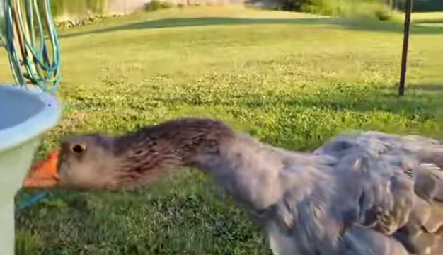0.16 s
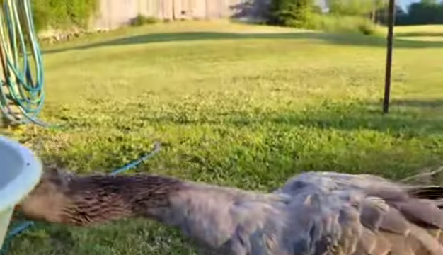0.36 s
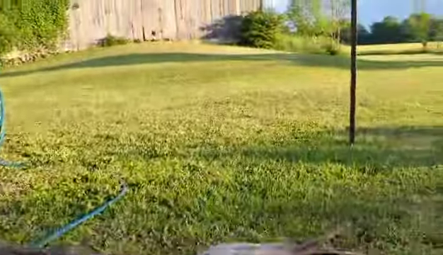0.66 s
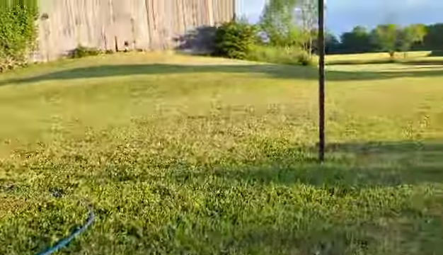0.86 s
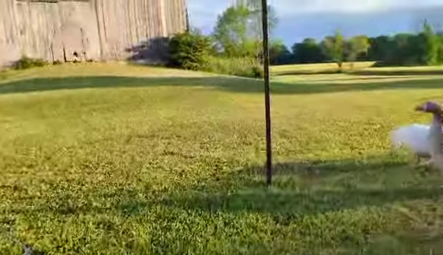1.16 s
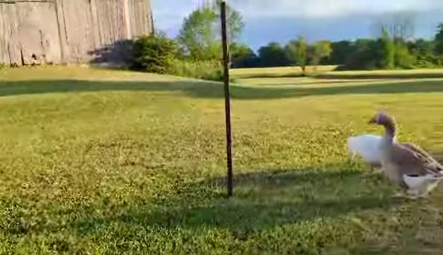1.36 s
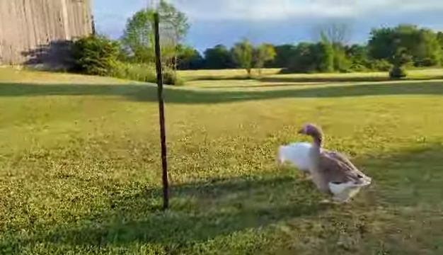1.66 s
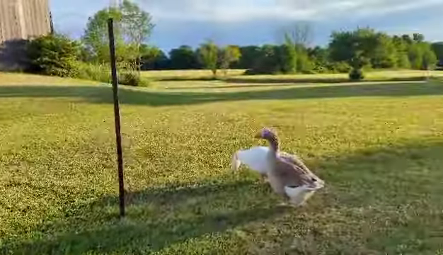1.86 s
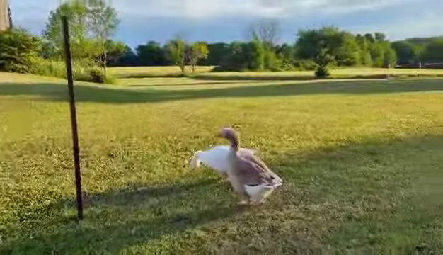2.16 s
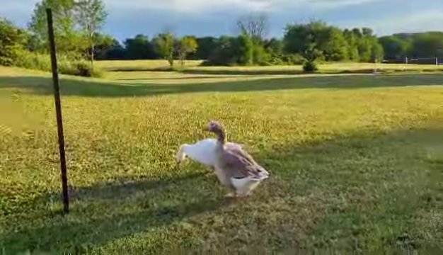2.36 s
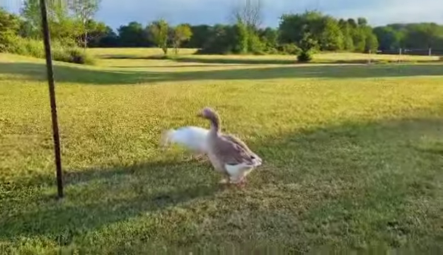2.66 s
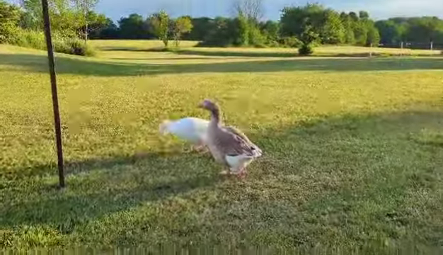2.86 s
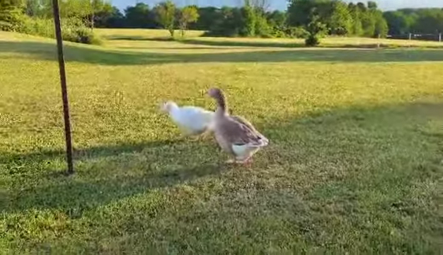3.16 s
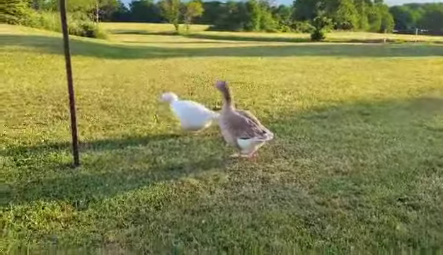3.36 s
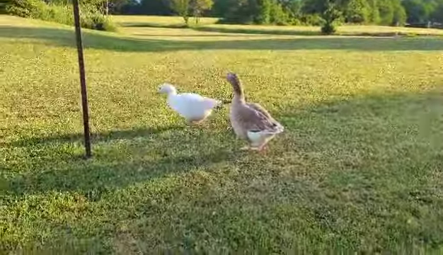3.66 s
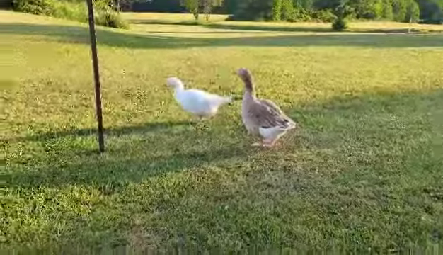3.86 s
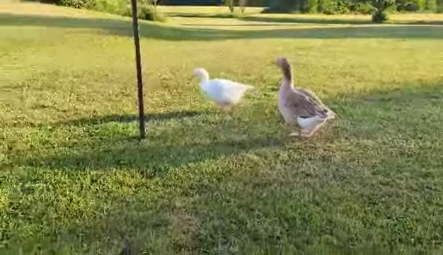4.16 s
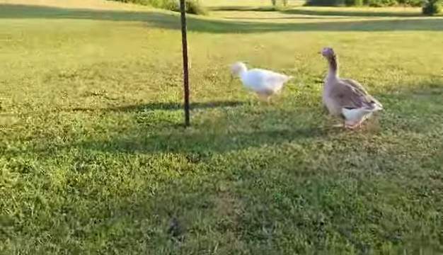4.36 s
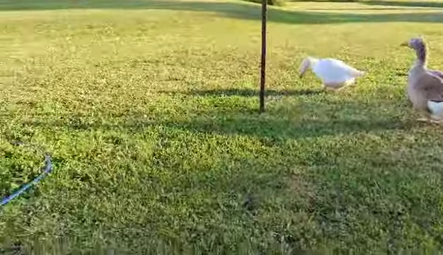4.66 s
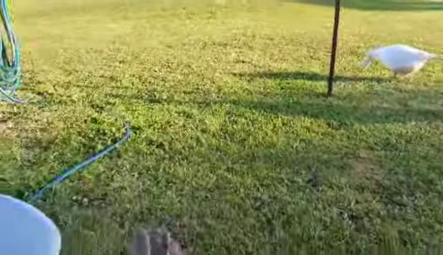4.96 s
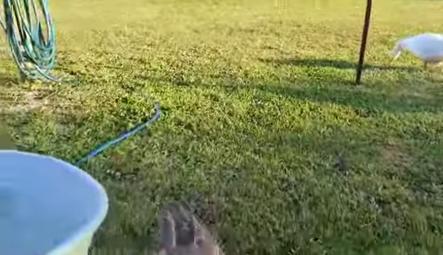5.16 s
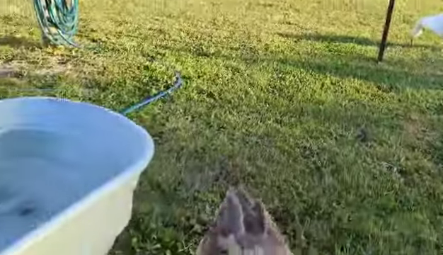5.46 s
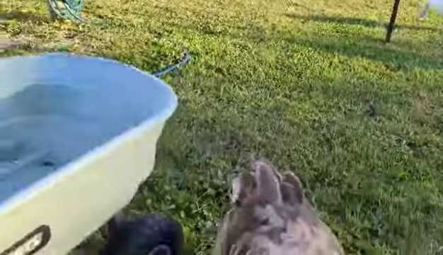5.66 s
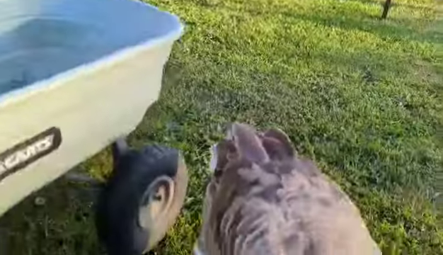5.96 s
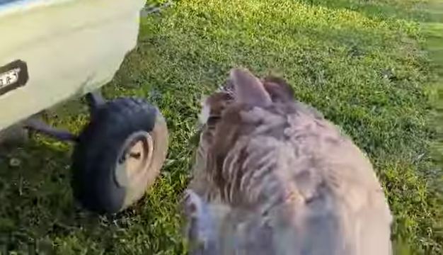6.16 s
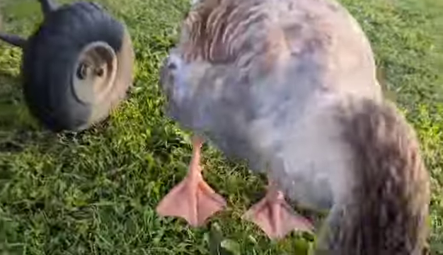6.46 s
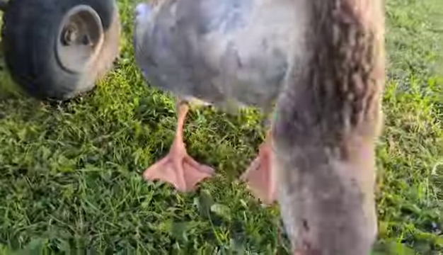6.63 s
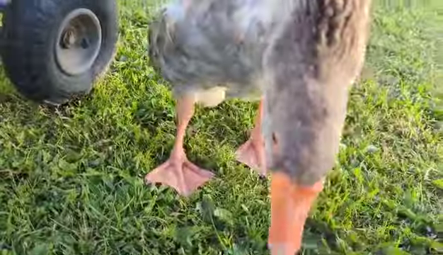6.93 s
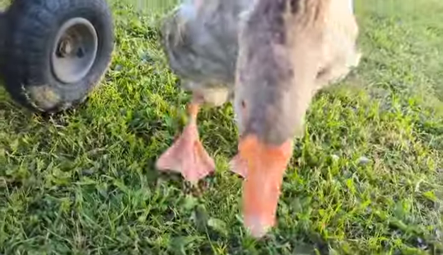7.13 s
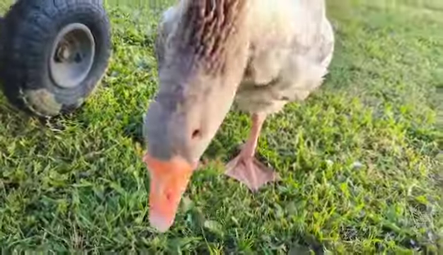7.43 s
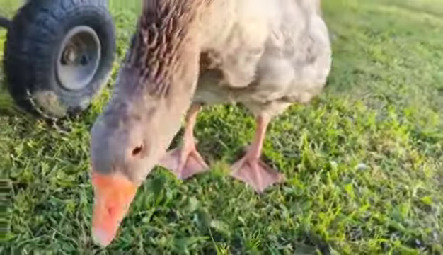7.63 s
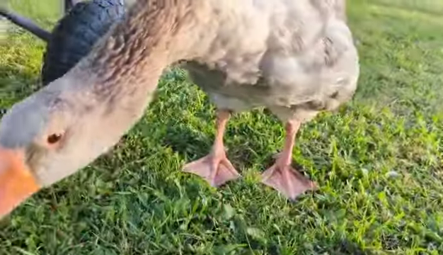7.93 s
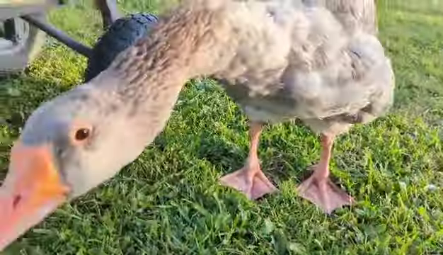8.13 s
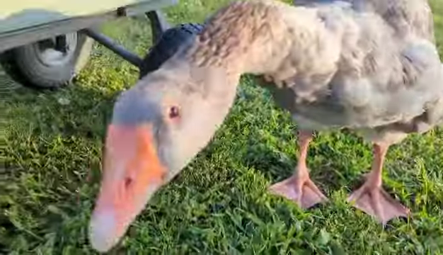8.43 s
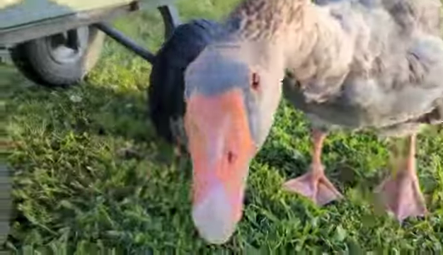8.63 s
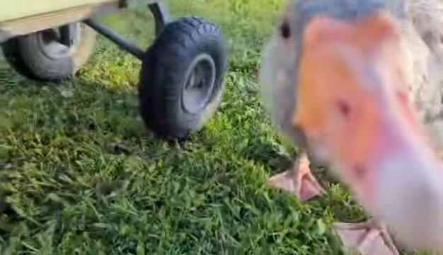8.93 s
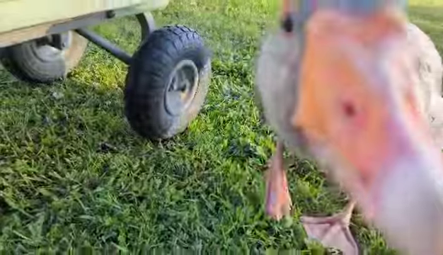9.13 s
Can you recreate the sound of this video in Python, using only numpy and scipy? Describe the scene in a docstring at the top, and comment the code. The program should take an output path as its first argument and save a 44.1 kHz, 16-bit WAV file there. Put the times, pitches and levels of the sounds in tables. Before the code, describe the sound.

From 0 to 0.8 s a goose very close gabbles fast and loud, sliding cries around 600 to 850 Hz alternating with lower, rasping honks near 570 Hz. It stops; a thin distant bird whistles at about 1 s, and hollow dull thuds knock at 1, 1.3, 1.6 and 2.4 s. A shorter, softer gabble at 2.1 to 2.6 s runs into six short, even honks from farther off until 3.7 s, growing louder. From 4.3 to 6.1 s come dry bill snaps, the sharpest at 5.7, breathy hisses and faint whimpers, with light rustling and slight wind puffs. Small falling whimpers at 6.3 to 6.7 s precede five nasal, swelling honks slightly right, 6.8 to 7.6 s. A hard rasping squawk bursts out at 7.7, then a pulsing, fluttering cackle with cries until 8.4 s. Only soft brushing and still open air remain, almost without echo.

```python
"""Geese on an open lawn

One goose gabbles close by with both sides of its syrinx: a sliding cry breaks into a lower honk, torn by
a fluttering rasp. In between it whimpers and hisses; at the end it squawks and cackles. Its voices are
harmonics through throat filters, its rasps slaps and puffs of noise. Two runs of short honks come from
farther off. Hollow thuds and rustles are shaped noise, a distant bird whistles in sines, a breeze buffets."""
import sys
import numpy as np
from scipy import signal
from scipy.fft import rfft, irfft, next_fast_len
from scipy.io import wavfile
from scipy.ndimage import map_coordinates

SR = 44100
rng = np.random.default_rng(int(sys.argv[2]) if len(sys.argv) > 2 else 0)


def master_out(mix):
    """Clip the mix to full scale and print it as 16-bit PCM to the path in sys.argv[1]."""
    frames = np.transpose(np.atleast_2d(mix))
    ceiling = np.clip(frames, -1, 1)
    pcm = np.round(ceiling * 32767).astype(np.int16)
    wavfile.write(sys.argv[1], SR, pcm)


N = 409679  # length [samples]

# where the near goose stands: (time [s], lead of the left microphone [ms], left over right [dB])
PLACE = [(.1, 0.24, 0), (.7, 0.329, 1.5), (2.1, 0.36, 2.5), (2.55, 0.34, -1), (4.35, -.08, -5),
         (4.9, .16, -8.5), (5.7, -.06, -5.5), (6.35, 0.2, 1), (6.7, 0.092, -0.5), (7.75, 0.19, 0.5),
         (8, 0.29, 2)]
# strain in its voice: (time [s], flutter rate [Hz], roughness [0-1])
STRAIN = [(.1, 185.9, 0.12), (.45, 189, 0.19), (.78, 178.7, 0.34), (2.2, 174.6, 0.25), (2.45, 169.5, 0.4),
          (7.92, 172.7, 0.07)]
# cries in its high voice: (start [s], length [s], start pitch [Hz], middle pitch [Hz], end pitch [Hz],
# level [dB], overtone tilt at the top pitch [dB per octave], roughness [0-1])
CRIES = [(0, 0.12, 616, 516.6, 495, -44, -5, 0.3), (0.081, 0.11, 610.6, 771, 635, -33.5, -22, 0.29),
         (0.22, 0.054, 658.5, 732, 745, -33.5, -7, 0.27), (0.286, 0.056, 694, 795, 843, -30, -5, 0.1),
         (0.385, 0.069, 728, 827, 787, -29.5, -6, 0.04), (0.492, 0.069, 787, 812, 840, -26.5, -4, 0.19),
         (0.591, 0.052, 766, 806, 863, -28, -2.5, 0.17), (0.698, 0.053, 787, 810, 851, -32, -0.5, 0.12),
         (.764, 0.06, 833, 775, 710, -39.5, -1.5, 0.4), (2.09, 0.054, 722, 761, 670, -34.5, -9.5, 0.16),
         (2.218, .074, 611, 677, 630, -40.5, -9.5, 0.2), (2.292, 0.099, 648, 763, 697, -39, -9.5, 0.24),
         (7.817, 0.045, 725, 683, 630, -39.5, -22, 0.5), (7.903, 0.026, 780, 822, 860, -22.5, -9, 0.28),
         (8.208, 0.056, 698, 744, 762, -29, -7.5, 0.23), (8.273, 0.046, 809, 734.5, 625, -30, -19.5, 0.39)]
# honks in its low voice: (start [s], length [s], top pitch [Hz], tone level [dB], rasp level [dB])
HONKS = [(0.115, 0.045, 553.5, -28.5, -34), (0.262, 0.048, 529.5, -38, -42),
         (0.329, 0.069, 571, -28.5, -39.5), (0.416, 0.073, 597.3, -28.5, -35),
         (0.566, 0.02, 591, -27.5, -34.5), (0.65, .042, 569.4, -28, -35.5), (.758, 0.047, 576, -27.5, -32),
         (2.1, 0.048, 539.5, -44, -48), (2.3, 0.078, 563, -39, -51.5), (2.405, 0.096, 574, -30, -40.5),
         (2.511, 0.071, 560.4, -30, -36.5), (6.623, .034, 483, -50.5, -67), (7.814, 0.033, 533, -34, -48.5),
         (7.931, 0.023, 556, -27.5, -35.5), (8.338, 0.12, 529.5, -55.5, -50)]
# throat colour of the cries' overtones: (frequency [Hz], gain [dB])
CRY_THROAT = [(1600, -8), (2450, -10.5), (3300, -3), (4100, -13), (4900, -9), (6600, -11), (12500, -43)]
# throat colour of the honks' tone: (frequency [Hz], gain [dB])
HONK_THROAT = [(550, -8), (1150, 6), (1600, -24.5), (2250, -8.5), (2800, -26.5), (3400, -21.5), (4100, -32),
               (6600, -33), (12000, -56)]
# throat colour of the noisy rasp: (frequency [Hz], gain [dB])
RASP_THROAT = [(50, -30), (170, 2), (360, -15.5), (560, 11.5), (1150, 11), (1520, -4.5), (2050, 14),
               (2750, -6.5), (3500, 1.5), (4400, -19), (6500, -16), (13000, -50)]
# throat colour of the flutter's even multiples in a honk: (frequency [Hz], gain [dB])
SUBTONE_THROAT = [(750, -1), (1100, -10), (1470, -14), (1850, 1), (2250, -4), (2600, -11), (2950, -7),
                  (3650, -7), (4400, -22), (7000, -27)]

# level of the wind's buffeting before gusts: (time [s], level [dB])
BREEZE = [(3.6, -68.5), (3.9, -90), (6.8, -80), (7.9, -75), (8.6, -83)]
# puffs of wind on the microphones: (time [s], left level [dB], right level [dB])
PUFFS = [(3.057, -56, -43), (3.24, -54.5, -45.5), (4.864, -53, -88), (5.269, -62.5, -80), (5.748, -59, -69)]
# colour of the buffeting: (frequency [Hz], gain [dB])
BUFFET = [(20, -31.5), (40, -8), (70, 5.5), (120, -3), (220, -15), (1500, -73.5)]
# steady rustling: (time [s], level [dB])
RUSTLE = [(.9, -62.5), (1.1, -76.5), (3.4, -87.5), (4.9, -57), (7, -64.5), (9.2, -62.5)]
# brief swishes close by: (time [s], level [dB])
SWISHES = [(.878, -64.5), (2.049, -61), (3.82, -59.5), (4.002, -55.5), (4.301, -55), (6.504, -55.5),
           (6.75, -48.5), (7.232, -48), (8.679, -59.5), (9.151, -55.5)]
# colour of rustles and swishes: (frequency [Hz], gain [dB])
FEATHERS = [(300, -15.5), (1300, -7.5), (5000, -0.5), (12500, 0.5)]
# colour of the still air: (frequency [Hz], gain [dB])
AIR = [(59, -22.5), (100, -2.5), (266, -7.5), (1250, 0.5), (2120, -1), (2820, -2.5), (13000, -15)]
# decay of the yard's reverberation: (frequency [Hz], t60 [s])
YARD_T60 = [(200, 0.34), (1000, 0.15), (3000, 0.38), (10000, 0.05)]

# a distant bird's whistles: (start [s], length [s], start pitch [Hz], end pitch [Hz], peak level [dB])
WHISTLES = [(0.953, 0.38, 3570, 3420, -67.5), (1.519, 0.086, 3100, 3080, -70.5)]
# hollow thuds: (time [s], level [dB], t60 [s])
THUDS = [(0.963, -47, 0.16), (1.318, -52.5, 0.1), (1.565, -37, 0.18), (2.362, -35.5, 0.47)]
# colour of the hollow body: (frequency [Hz], gain [dB])
THUD_BODY = [(90, -21.5), (230, 2), (480, -6.5), (700, -9.5), (2500, -35), (6000, -46.5)]

# short honks from farther off: (start [s], length [s], pitch [Hz], fall [share of the pitch], level [dB],
# roughness [0-1], left over right [dB], overtone tilt [dB per octave])
ANSWERS = [(2.617, 0.086, 508.3, 0.013, -35, 0.3, -2, -1.5), (2.827, .11, 507, 0, -40, 0.29, -1, -4),
           (3.039, .11, 507, .01, -35, 0.4, -1, -1.5), (3.222, .12, 512.5, .04, -28, 0.24, -0.5, 0),
           (3.4, .12, 501.5, .01, -28.5, 0.06, -3.5, 0), (3.573, 0.11, 498.7, 0.016, -28, 0.06, -3.5, 0.5),
           (6.805, 0.11, 524, 0.033, -39.5, .3, -2.5, -4), (7.016, .11, 543.7, 0.056, -35.5, .4, -2, -0.5),
           (7.19, 0.12, 534, 0.075, -30, 0.16, -3.5, 0.5), (7.365, .11, 523.7, 0.056, -28, 0.06, -2, 1),
           (7.544, 0.085, 507, 0.055, -29.5, .12, -1.5, 2)]
# course of a short honk: (time [share of its length], pitch [ratio], tone level [dB], rasp level [dB])
COURSE = [(0, .96, -48, -28), (.08, .96, -29, -18.5), (.12, .97, -11.5, -5.5), (.27, .995, -3, -8.5),
          (.45, 1.003, 2, -41.5), (.65, 1, -2.5, -35), (.82, .98, -4, -26), (1, .88, -24, -27)]
# throat colour of the first run: (frequency [Hz], gain [dB])
FIRST_THROAT = [(500, -8.5), (1000, 2), (1500, -21), (2500, -29.5), (3020, -13.5), (3550, -42.5),
                (4100, -30.5), (4600, -36), (5700, -57.5), (6700, -38.5), (8200, -38.5), (12500, -51.5)]
# throat colour of the second run: (frequency [Hz], gain [dB])
SECOND_THROAT = [(500, -1.5), (1050, 0), (1600, -5.5), (2100, -17), (2600, -11.5), (3100, -15.5),
                 (3700, -30.5), (4400, -28), (5800, -41), (12500, -44)]
# colour of the opening rasp: (frequency [Hz], gain [dB])
ANSWER_RASP = [(120, -11.5), (350, -15), (520, -7), (760, 14), (1080, -11), (1400, -12.5), (3100, -10.5),
               (3800, -31.5), (13000, -42)]
# colour of the grit at half the pitch: (frequency [Hz], gain [dB])
ANSWER_GRIT = [(300, -17.5), (750, 5), (1400, -2.5), (2000, -14), (3200, -5.5), (3900, -32.5),
               (6800, -19.5), (13000, -43.5)]
# colour of the second bird's bright catch: (frequency [Hz], gain [dB])
CATCH = [(300, -5), (800, -3.5), (1700, -2.5), (3000, -3.5), (4400, -9.5), (5500, -30), (12000, -33)]

# the near goose's hisses: (start [s], length [s], attack [s], throat level [dB], sizzle level [dB])
HISSES = [(4.355, 0.049, .06, -45, -49), (4.787, 0.5, .1, -57, -52), (5.655, 0.14, 0.011, -44, -46.5),
          (5.863, 0.07, .04, -62, -58.5)]
# throat part of a hiss: (frequency [Hz], gain [dB])
HISS_THROAT = [(450, -21), (950, -5.5), (1300, 8), (2300, -5), (6000, -44)]
# sizzling part of a hiss: (frequency [Hz], gain [dB])
HISS_SIZZLE = [(1000, -23), (2800, -0.5), (6000, 0.5), (13000, -16.5)]
# snaps of the bill around the hisses: (time [s], level [dB])
SNAPS = [(4.287, -37), (4.432, -35), (4.853, -43), (5.253, -40), (5.298, -45), (5.657, -21)]
# colour of the bill's snap: (frequency [Hz], gain [dB])
BILL = [(150, -31), (600, -13.5), (1200, 12.5), (2200, -5), (3200, -18.5), (12000, -22.5)]
# whimpers through the nearly shut bill: (start [s], length [s], start pitch [Hz], middle pitch [Hz],
# end pitch [Hz], level [dB], overtone over fundamental [dB])
WHIMPERS = [(4.734, 0.095, 796, 682, 577, -55.5, 0), (5.132, 0.095, 725, 705, 655, -60, -16),
            (5.966, 0.086, 812, 840, 780, -65.5, -11.5), (6.066, 0.017, 795, 774, 740, -56, -6),
            (6.333, 0.039, 902, 932, 900, -52.5, -3.5), (6.375, 0.05, 794, 808, 697, -48.5, -12),
            (6.652, 0.035, 890, 870, 837, -47.5, -11), (6.696, 0.044, 790, 742, 690, -42.5, -11.5)]
# throat colour of the squawk: (frequency [Hz], gain [dB])
SQUAWK_THROAT = [(80, -37), (190, 1), (370, -23), (570, -7.5), (1150, 3), (1700, -14.5), (2300, -4),
                 (3000, -16.5), (3900, -12.5), (4500, -26), (6800, -32.5), (13000, -52.5)]
# the closing cackle, one unbroken flutter: (time [s], flutter rate [Hz], level [dB])
CACKLE = [(7.895, 171, -46), (7.91, 176.9, -31), (7.957, 172, -34), (7.995, 174.1, -28.5),
          (8.03, 186.5, -25), (8.064, 169.9, -32), (8.099, 162.5, -33), (8.13, 172.1, -30.5),
          (8.17, 187.2, -23.5), (8.211, 169.5, -35.5), (8.235, 174, -33), (8.273, 190.8, -23),
          (8.309, 168.5, -31.5), (8.33, 148.5, -44.5)]
# cackle throat with the bill shut: (frequency [Hz], gain [dB])
SHUT_THROAT = [(160, 3), (330, -24), (520, -9.5), (1000, -9), (1400, -22), (2000, -13), (2900, -25),
               (3800, -21), (4800, -39), (7500, -42)]
# cackle throat with the bill open: (frequency [Hz], gain [dB])
OPEN_THROAT = [(178, -12), (350, -33.5), (550, -4), (750, -4.5), (1450, -10), (2100, 0.5), (2900, -20.5),
               (3700, -12.5), (4600, -32), (7500, -39)]

# attack and release are the times to rise and to fall by 20 dB; swell is the middle over the ends
CRY_ATTACK_S, CRY_RELEASE_S, CRY_SWELL_DB = .012, 0.0046, 2
CRY_BRIGHTENING = 34  # change of tilt per octave of pitch [dB per octave]
CRY_RASP_DB = 2  # rasp under a cry at full roughness
CRY_WARBLE, CRY_JITTER = 1.1, .008  # flutter in the phase [radians]; random share of the pitch
HONK_ATTACK_S, HONK_RELEASE_S, HONK_SWELL_DB = .007, 0.011, 3.5
HONK_ARCH, HONK_SAG = .05, .02  # shares of the pitch: ends below the middle; fall from start to end
FULL_HONK_DB, HONK_DULLING = -27, 1  # below this level overtones fade: dB per octave, for each dB
HONK_RASP_DB, SUBTONE_DB = -2.5, -1  # noisy part and flutter multiples of a honk's rasp
RASP_SWELL_DB = 3.5  # a honk's rasp swells this much more than its tone
FLUTTER_JITTER, RASP_AIR = .3, .9  # timing scatter at full roughness [radians]; air over slaps
DRIFT_DB = 3.3  # each overtone's own swelling and fading
GUST_DB, PUFF_RISE_S, PUFF_FALL_S = 4, 0.023, 0.076
RUSTLE_GRAIN_DB, RUSTLE_CHANGE_DB = 2.8, 2.5  # random level changes, about 60 and 14 times a second
SWISH_RISE_S, SWISH_FALL_S = .04, 0.019
AIR_DB, YARD_DB = -69, -18  # still air; the yard's answer below the voices
WHISTLE_FADE_S = 0.028
SECOND_BIRD_FROM_S = 5
SECOND_SOFT_START_DB, SECOND_SWELL_SHARE = 9, 0.27  # it swells more slowly, over this share of a honk
CATCH_DB, CATCH_T60_S = -15, 0.082
GRIT_DB, ANSWER_WANDER = -0.5, .008  # grit at full roughness; random share of the pitch
HISS_RELEASE_S, HISS_SWELL_DB = 0.058, 2.5
HISS_SAG_DB = 4  # the throat's loss as the air runs out
WHIMPER_FADE_S, WHIMPER_HAZE = 0.011, 0.51  # 20 dB fade; unsteadiness of phase [radians] and level
SQUAWK_S, SQUAWK_LENGTH_S, SQUAWK_HZ, SQUAWK_DB = 7.671, 0.058, 190, -20.5  # Hz: mean flutter rate
SQUAWK_SAG = .14  # share of its rate that the squawk's flutter loses
SQUAWK_JITTER, SQUAWK_AIR = .15, .3  # timing scatter [radians]; air over slaps
SHUT_HZ, OPEN_HZ = 165.9, 180  # flutter rates at which the bill is shut and wide open
CACKLE_JITTER, CACKLE_RASP_DB = .06, -6  # with the bill wide open: timing scatter [radians]; rasp
ODD_DB = -7  # odd flutter multiples with the bill wide open
MOUTH_SHUT_HZ, MOUTH_OPEN_HZ, MOUTH_WIDTH_HZ, MOUTH_DB = 700, 1080, 140, 14  # moving resonance
TOP_HZ = 13150  # band limit


def amp(db):
    """Decibels to gain."""
    return 10 ** (np.asarray(db) / 20)


def unit(x):
    """Scaled to rms 1."""
    return x / np.sqrt(np.mean(x ** 2) + 1e-20)


def along(points, hz):
    """(Hz, value) points read on a log axis."""
    f, v = np.transpose(points)
    return np.interp(np.log(hz + 1), np.log(f + 1), v)


def read(rows, t):
    """Each column after the first, at the times t."""
    s, *cols = np.transpose(rows)
    return [np.interp(t, s, c) for c in cols]


def span(start, end, fade=0.0063):
    """Sample indices, times and a soft-edged gate for one sound."""
    i = np.arange(max(0, int((start - fade) * SR)), min(N, int((end + fade) * SR)))
    t = i / SR
    edge = np.minimum(t - start + fade, end + fade - t) / fade
    return i, t, np.sin(np.pi / 2 * np.clip(edge, 0, 1)) ** 2


def syllable(s, length, attack_s, release_s, swell_db):
    """Sample indices, progress 0-1 and level in dB of one utterance: attack, rounded hold, release."""
    first = max(0, int((s - 3 * attack_s) * SR))
    last = min(N, int((s + length + 3 * release_s) * SR))
    i = np.arange(first, last)
    t = i / SR - s
    u = np.clip(t / length, 0, 1)
    edges = np.maximum(-t / attack_s, 0) + np.maximum((t - length) / release_s, 0)
    return i, u, -20 * edges - swell_db * (2 * u - 1) ** 2


def swell(s, rise_s, fall_s):
    """A smooth rise to the time s and a fall after it."""
    t = np.arange(N) / SR - s
    return np.exp(-np.minimum((t / np.where(t < 0, rise_s, fall_s)) ** 2, 20))


def wobble(n, rate):
    """A smooth random curve with rate knots a second."""
    return map_coordinates(rng.standard_normal(int(n * rate / SR) + 4), [np.arange(n) * rate / SR])


def colour(x, points):
    """x through a causal (minimum-phase) filter with the given (Hz, dB) gains."""
    n = x.shape[-1]
    m = 2 * next_fast_len(n // 2 + 2048)
    cepstrum = irfft(np.log(amp(along(points, np.fft.rfftfreq(m, 1 / SR)))), m)
    # folding the cepstrum forward makes the filter causal
    cepstrum[1:m // 2] *= 2
    cepstrum[m // 2 + 1:] = 0
    return irfft(rfft(x, m) * np.exp(rfft(cepstrum)), m)[..., :n]


def noise(shape, points):
    """Coloured noise of rms 1."""
    return unit(colour(rng.standard_normal(shape), points))


def cycles(hz):
    """Phase in radians of a moving pitch."""
    return 2 * np.pi * np.cumsum(hz) / SR


def glide(start_hz, middle_hz, end_hz, u):
    """A pitch that follows a parabola through its start, middle and end."""
    return np.polyval(np.polyfit([0, .5, 1], [start_hz, middle_hz, end_hz], 2), u)


def harmonics(phase, hz, throat, order, count, tilt_db=0):
    """Harmonics order to count, shaped by throat and tilt; those above the second drift on their own."""
    k = np.arange(order, count + 1)[:, None]
    drift_db = DRIFT_DB * (k > 2) * np.array([wobble(len(phase), 31.2) for _ in k])
    gain = amp(along(throat, k * hz) + tilt_db * np.log2(k) + drift_db)
    return np.sqrt(2) * np.sum(gain * np.sin(k * phase), axis=0)


def rasp(phase, throat, air, scatter_db=3):
    """One uneven slap and one puff of air per flutter cycle, through the throat."""
    cycle = np.floor(phase / (2 * np.pi))
    slaps = np.diff(cycle, prepend=cycle[0]) * amp(scatter_db * rng.standard_normal(len(phase)))
    puffs = rng.standard_normal(len(phase)) * (1 + .5 * np.cos(phase - 1))
    return unit(colour(unit(slaps) + air * unit(puffs), throat))


def placed(x, lead_ms, balance_db):
    """A source reaches the two microphones at different times and levels."""
    i = np.arange(len(x))
    shift = lead_ms * SR / 2000  # half the lead, in samples
    return np.array([map_coordinates(x, [i + side * shift]) * amp(side * balance_db / 2)
                     for side in (1, -1)])


def near_goose():
    """Two voices take turns in one throat; the flutter of its membranes shakes both."""
    clock = np.arange(N) / SR
    flutter_hz, rough = read(STRAIN, clock)
    flutter = cycles(flutter_hz * (1 + .05 * wobble(N, 130)))
    voice = cries(flutter) + honks(flutter_hz, rough) + whimpers() + squawk() + cackle()
    return placed(voice, *read(PLACE, clock))


def cries(flutter):
    """The high voice slides through each cry and brightens as it climbs."""
    out = np.zeros(N)
    for s, length, start_hz, middle_hz, end_hz, db, tilt_db, rough in CRIES:
        i, u, shape_db = syllable(s, length, CRY_ATTACK_S, CRY_RELEASE_S, CRY_SWELL_DB)
        hz = glide(start_hz, middle_hz, end_hz, u)
        phase = cycles(hz * (1 + CRY_JITTER * wobble(len(i), 120)))
        phase += rough * (.5 * wobble(len(i), 600) + CRY_WARBLE * np.sin(flutter[i]))
        bright_db = tilt_db + CRY_BRIGHTENING * np.log2(hz / hz.max())
        overtones = harmonics(phase, hz, CRY_THROAT, order=2, count=16, tilt_db=bright_db)
        tone = np.sqrt(2) * np.sin(phase) + overtones
        shake = 1 + rough * (0.2 * np.cos(flutter[i]) + 0.6 * wobble(len(i), 180))
        torn = rough * amp(CRY_RASP_DB) * rasp(flutter[i], RASP_THROAT, air=1.0)
        out[i] += amp(db + shape_db) * (shake * tone + torn)
    return out


def honks(flutter_hz, rough):
    """The low voice arches and dulls when soft; its rasp flutters once every third cycle of the tone."""
    out = np.zeros(N)
    for s, length, top_hz, db, rasp_db in HONKS:
        i, u, shape_db = syllable(s, length, HONK_ATTACK_S, HONK_RELEASE_S, HONK_SWELL_DB)
        hz = top_hz * (1 - HONK_ARCH * (2 * u - 1) ** 2 - HONK_SAG * (u - .5))
        locked_hz = hz / np.round(top_hz / flutter_hz[i].mean())
        flutter = cycles(locked_hz) + FLUTTER_JITTER * rough[i] * wobble(len(i), 200)
        phase = cycles(hz) + rough[i] * (0.14 * np.sin(flutter) + 0.52 * wobble(len(i), 400))
        shake = 1 + rough[i] * (0.24 * np.cos(flutter - 1) + 0.98 * wobble(len(i), 250))
        softness_db = min(db - FULL_HONK_DB, 0)
        tone = amp(db) * shake * harmonics(phase, hz, HONK_THROAT, order=1, count=22,
                                           tilt_db=HONK_DULLING * softness_db)
        # even multiples of the flutter, some of them between the tone's harmonics
        subtones = unit(harmonics(2 * flutter, 2 * locked_hz, SUBTONE_THROAT, order=2, count=19))
        rattle = amp(HONK_RASP_DB) * rasp(flutter, RASP_THROAT, RASP_AIR)
        rattle += amp(SUBTONE_DB + softness_db / 2) * subtones
        rattle *= amp(rasp_db - RASP_SWELL_DB * (2 * u - 1) ** 2)
        out[i] += amp(shape_db) * (tone + rattle)
    return out


def bounce(x, delay_ms=1.0845, sway=0.22):
    """A thin, bright reflection from close by, its delay swaying at random for each microphone."""
    late = [np.arange(N) - delay_ms * SR / 1000 * (1 + sway * wobble(N, 4)) for _ in x]
    echo = np.array([map_coordinates(side, [i], order=1) for side, i in zip(x, late)])
    return colour(echo, [(700, -20.5), (1800, -1.5)])


def yard(x):
    """A faint scattered answer from the barn and the trees: decaying noise as an impulse response."""
    hz, t, z = signal.stft(rng.standard_normal((2, SR // 2)), SR, nperseg=256)
    decay = amp(-60 * t / along(YARD_T60, hz)[:, None])
    tail = signal.istft(z * decay, SR, nperseg=256)[1]
    return signal.fftconvolve(x, tail / np.linalg.norm(tail[0]), axes=1)[:, :N]


def breeze():
    """Wind buffets the microphones as low noise, partly shared, in random gusts and single puffs."""
    (breeze_db,) = read(BREEZE, np.arange(N) / SR)
    wind = amp(breeze_db + GUST_DB * wobble(N, 15))
    puffs = sum(amp([[left_db], [right_db]]) * swell(s, PUFF_RISE_S, PUFF_FALL_S)
                for s, left_db, right_db in PUFFS)
    return (wind + puffs) * (noise((2, N), BUFFET) + noise(N, BUFFET))


def rustling():
    """Brushing close by: bright noise whose level changes at random, and brief swishes."""
    (rustle_db,) = read(RUSTLE, np.arange(N) / SR)
    swishes = sum(amp(db) * swell(s, SWISH_RISE_S, SWISH_FALL_S) for s, db in SWISHES)
    unevenness = amp(RUSTLE_GRAIN_DB * wobble(N, 60) + RUSTLE_CHANGE_DB * wobble(N, 14))
    brushing = noise((2, N), FEATHERS) + 0.34 * noise(N, FEATHERS)
    return (amp(rustle_db) + swishes) * unevenness * brushing


def still_air():
    """The still air of the fields: steady wide noise, a little of it shared by both sides."""
    return amp(AIR_DB) * (noise((2, N), AIR) + 0.13 * noise(N, AIR))


def songbird():
    """Thin, slightly falling whistles from the trees: single sines of uneven level."""
    out = np.zeros(N)
    for s, length, start_hz, end_hz, db in WHISTLES:
        i, u, shape_db = syllable(s, length, WHISTLE_FADE_S, WHISTLE_FADE_S, swell_db=4.0)
        level = amp(db + shape_db + 2.0 * wobble(len(i), 18.5))
        out[i] += level * np.sin(cycles(start_hz + (end_hz - start_hz) * u))
    return out


def thuds():
    """Dull knocks on something hollow, off to the left: decaying bursts of low noise."""
    out = np.zeros(N)
    for s, db, t60 in THUDS:
        i, t, gate = span(s + 0.0031, s + 0.14, fade=0.0018)
        out[i] += amp(db - 60 * (t - s) / t60) * gate * noise(len(t), THUD_BODY)
    return placed(out, lead_ms=0.53, balance_db=2.0)


def answers():
    """Each short honk bursts out as a rasp, locks into a tone and sags; the second run is more nasal."""
    out = np.zeros((2, N))
    for s, length, pitch_hz, fall, db, rough, balance_db, tilt_db in ANSWERS:
        i, t, gate = span(s, s + length, fade=.003)
        n = len(t)
        u = (t - s) / length
        ratio, tone_db, rasp_db = read(COURSE, u)
        throat, lead_ms, catch = FIRST_THROAT, 0, 0
        if s > SECOND_BIRD_FROM_S:
            throat, lead_ms = SECOND_THROAT, -.25  # off to the right
            tone_db = tone_db - SECOND_SOFT_START_DB * np.clip(1 - u / SECOND_SWELL_SHARE, 0, 1)
            # the throat opens with a bright catch
            catch = amp(CATCH_DB - 60 * abs(t - s) / CATCH_T60_S) * noise(n, CATCH)
        hz = pitch_hz * ratio * (1 - fall * (u - .5) + ANSWER_WANDER * wobble(n, 45))
        phase = cycles(hz) + (.015 + 0.45 * rough) * wobble(n, 500)
        tone = unit(harmonics(phase, hz, throat, order=1, count=24, tilt_db=tilt_db))
        tone *= amp(tone_db) * (1 + 0.61 * rough * wobble(n, 200))
        slap_phase = cycles(200 * (1 + .2 * wobble(n, 150)))
        burst = amp(rasp_db) * rasp(slap_phase, ANSWER_RASP, air=0.48)
        # rough honks keep a grit at half the pitch
        half_phase = cycles(hz / 2) + 0.3 * wobble(n, 200)
        grit = rough * amp(tone_db + GRIT_DB) * rasp(half_phase, ANSWER_GRIT, RASP_AIR)
        out[:, i] += placed(amp(db) * gate * (tone + burst + grit + catch), lead_ms, balance_db)
    return out


def hisses():
    """Air forced through the open bill, noise in a throat band and a sizzle, with snaps of the bill."""
    out = np.zeros(N)
    for s, length, attack_s, throat_db, sizzle_db in HISSES:
        i, u, shape_db = syllable(s, length, attack_s, HISS_RELEASE_S, HISS_SWELL_DB)
        air = amp(throat_db - HISS_SAG_DB * u) * noise(len(i), HISS_THROAT)
        air += amp(sizzle_db) * noise(len(i), HISS_SIZZLE)
        out[i] += air * amp(shape_db + 1.2 * wobble(len(i), 90))
    for s, db in SNAPS:
        i, t, gate = span(s, s + 0.041, fade=0.00057)
        decay = amp(-60 * (t - s) / 0.0036)
        out[i] += amp(db) * gate * decay * noise(len(t), BILL)
    return placed(out, *read(PLACE, np.arange(N) / SR))


def whimpers():
    """Soft, hazy, mostly falling notes with a single overtone."""
    out = np.zeros(N)
    for s, length, start_hz, middle_hz, end_hz, db, overtone_db in WHIMPERS:
        i, u, shape_db = syllable(s, length, WHIMPER_FADE_S, WHIMPER_FADE_S, swell_db=4.0)
        phase = cycles(glide(start_hz, middle_hz, end_hz, u)) + WHIMPER_HAZE * wobble(len(i), 297.5)
        tone = np.sqrt(2) * (np.sin(phase) + amp(overtone_db) * np.sin(2 * phase))
        out[i] += amp(db + shape_db) * tone * (1 + WHIMPER_HAZE * wobble(len(i), 199))
    return out


def squawk():
    """One abrupt blast of hard, slowing slaps through the wide open bill."""
    out = np.zeros(N)
    i, u, shape_db = syllable(SQUAWK_S, SQUAWK_LENGTH_S, attack_s=0.0025, release_s=0.018, swell_db=1.5)
    flutter = cycles(SQUAWK_HZ * (1 - SQUAWK_SAG * (u - .5)))
    flutter += SQUAWK_JITTER * wobble(len(i), SQUAWK_HZ)
    slaps = rasp(flutter, SQUAWK_THROAT, SQUAWK_AIR, scatter_db=2.5)
    out[i] = amp(SQUAWK_DB + shape_db) * slaps
    return out


def cackle():
    """The bare flutter: as it speeds up the bill opens, the mouth's resonance climbs and it turns harsh."""
    out = np.zeros(N)
    i, t, gate = span(CACKLE[0][0], CACKLE[-1][0])
    hz, db = read(CACKLE, t)
    opening = np.clip((hz - SHUT_HZ) / (OPEN_HZ - SHUT_HZ), 0, 1)
    harshness = (1 + opening) / 2
    flutter = cycles(hz) + CACKLE_JITTER * harshness * wobble(len(t), 250)
    k = np.arange(1, 42)[:, None]  # multiples of the flutter
    throat_db = (1 - opening) * along(SHUT_THROAT, k * hz) + opening * along(OPEN_THROAT, k * hz)
    mouth_hz = MOUTH_SHUT_HZ + (MOUTH_OPEN_HZ - MOUTH_SHUT_HZ) * opening
    mouth_db = MOUTH_DB * np.exp(-((k * hz - mouth_hz) / MOUTH_WIDTH_HZ) ** 2)
    odd_db = ODD_DB * opening * (k > 1) * (k % 2)
    drift_db = DRIFT_DB * np.array([wobble(len(t), 60) for _ in k])
    gain = amp(throat_db + mouth_db + odd_db + drift_db)
    waves = np.sin(k * flutter + rng.uniform(0, 2 * np.pi, k.shape))
    voice = np.sqrt(2) * np.sum(gain * waves, axis=0) / np.linalg.norm(gain, axis=0)
    rattle = amp(CACKLE_RASP_DB) * harshness * rasp(flutter, RASP_THROAT, air=.45)
    out[i] = gate * amp(db) * (voice + rattle)
    return out


def scene():
    """The geese and their surroundings; only the voiced geese are reflected."""
    geese = near_goose() + answers()
    reflections = bounce(geese) + yard(amp(YARD_DB) * geese)
    background = breeze() + rustling() + still_air()
    return geese + reflections + background + songbird() + thuds() + hisses()


def record(dry):
    """Nothing is kept above the band limit."""
    m = next_fast_len(N + SR // 2)
    return irfft(rfft(dry, m) * (np.fft.rfftfreq(m, 1 / SR) < TOP_HZ), m)[:, :N]


dry = scene()
out = record(dry)
master_out(out)
```